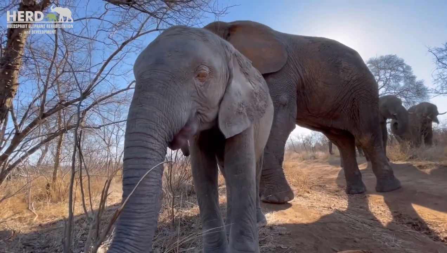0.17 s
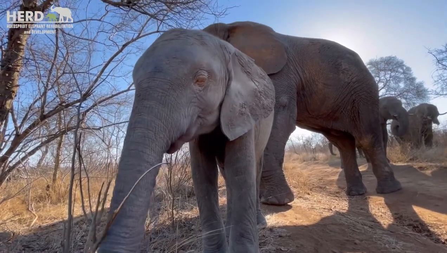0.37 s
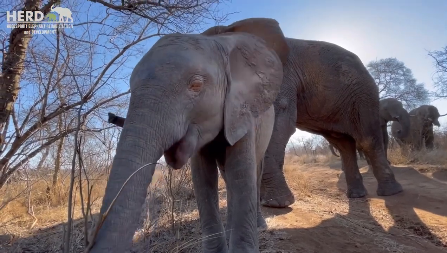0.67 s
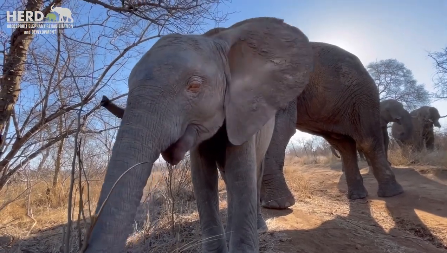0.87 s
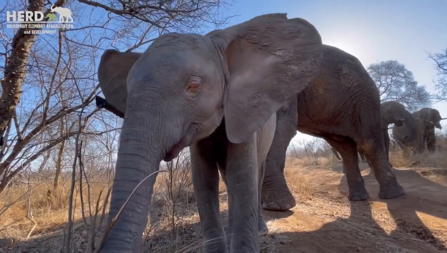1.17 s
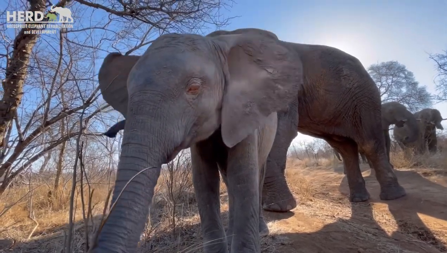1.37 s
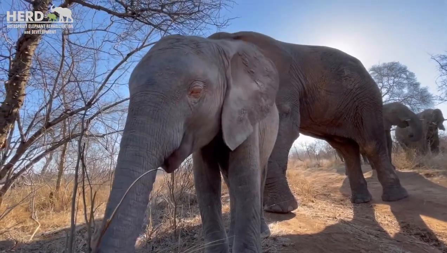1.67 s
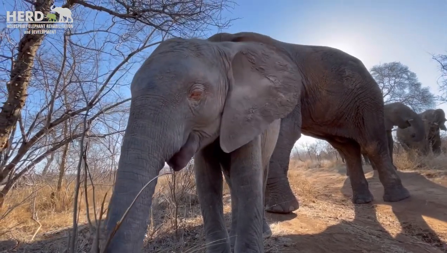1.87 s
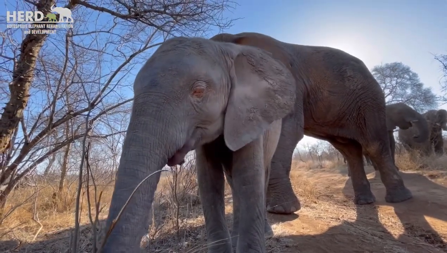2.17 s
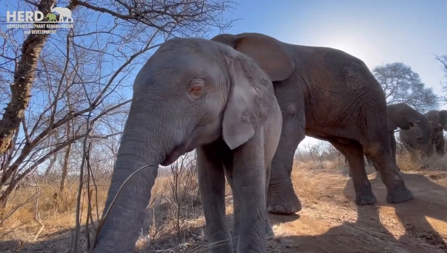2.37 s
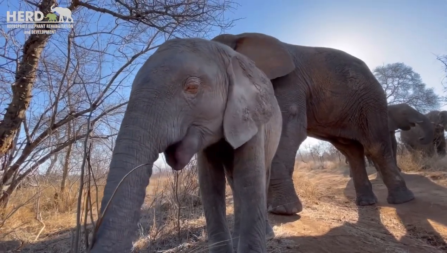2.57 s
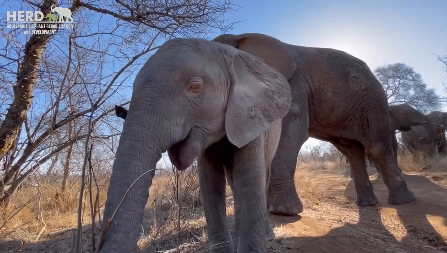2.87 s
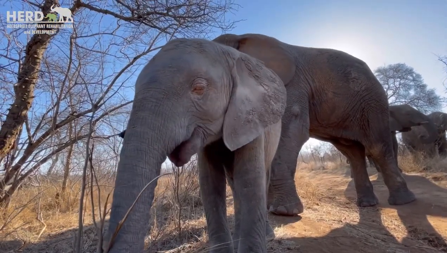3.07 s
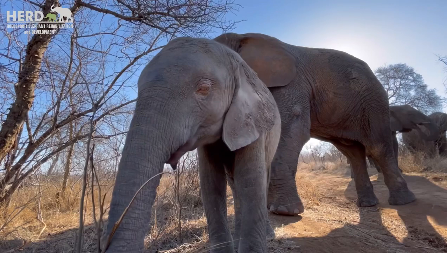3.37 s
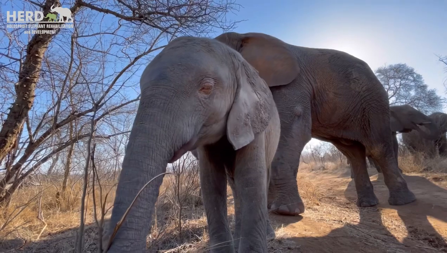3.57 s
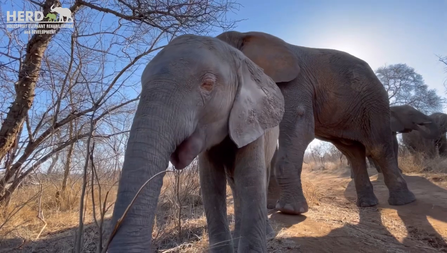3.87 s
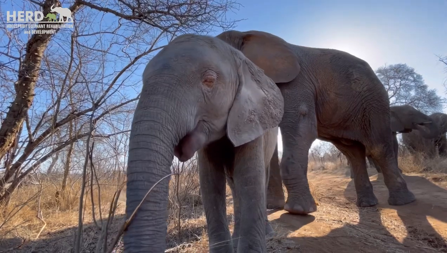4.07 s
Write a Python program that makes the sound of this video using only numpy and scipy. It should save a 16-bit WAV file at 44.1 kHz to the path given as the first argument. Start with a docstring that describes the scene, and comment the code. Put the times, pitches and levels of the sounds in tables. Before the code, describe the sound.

Light brushing of stalks and soft low thumps come first, with a low elephant rumble of about a second. After a short pause of rustling, a strong snap cracks close by. A wet smack releases a louder, coarse, fluttering growl, brighter and faster than the rumble. Then dry grass scrapes and crackles again, very near the microphone, in open air with almost no echo.

```python
"""A young elephant gives a low rumble, then smacks its mouth open for a louder, rattling call in dry bushland.
Flapping vocal folds sound as harmonics of the chest; their closures and breath ring the mouth resonances.
The trunk drags through dry grass and twigs close to a two-port microphone: coloured, crackling noise with
short snaps. Dull decaying thumps, narrow-band murmurs, a faint fuzzy whistle and a low noisy wash of air
and herd lie underneath."""
import sys
import numpy as np
from scipy import signal
from scipy.fft import rfft, irfft
from scipy.io import wavfile
from scipy.ndimage import uniform_filter1d, map_coordinates

SR = 44100
rng = np.random.default_rng(int(sys.argv[2]) if len(sys.argv) > 2 else 0)


def unload_audio(sound):
    """Save the sound as a 16-bit wav file, at the path given as the first command line argument."""
    columns = np.transpose(np.atleast_2d(sound))
    # keep every value between -1 and 1, then stretch to whole-number steps
    steps = np.round(np.clip(columns, -1, 1) * 32767)
    wavfile.write(sys.argv[1], SR, steps.astype(np.int16))


N = 185264  # samples


def rumble_voice():
    """The low rumble: slow folds that start loose and settle, heard through chest and mouth."""
    # vocal folds: (time [s], flap rate [1/s])
    rate = [(.3, 20.1), (.55, 20.0), (.72, 19.97), (.87, 19.8), (1.02, 19.73), (1.17, 19.42), (1.32, 19.3),
            (1.6, 18.9)]
    # effort: (time [s], chest [dB], mouth [dB], lingering of the main mouth ring [dB], upper harmonics [dB])
    effort = [(.34, -57, -57.5, -15.5, 7), (.4, -45.5, -56, -20.5, 7.5), (.5, -46, -53.5, -14, -7),
              (.58, -40.5, -54, -11.5, 3.5), (.67, -38, -54, -12.5, -1), (.72, -38.5, -68.5, -14, 1),
              (.97, -39, -70.5, -10, -0.5), (1.15, -38, -59, 0.5, 0), (1.3, -39.5, -57.5, 0, -2),
              (1.48, -38, -55, -0.5, -2.5), (1.5, -41, -70, -8, -4.5), (1.57, -50.5, -85, -13.5, -8.5)]
    # chest harmonics: (multiple of the flap rate, level [dB])
    harmonics = [(1, -42), (2, 0.41), (3, -2), (4, -2.5), (5, -9.5), (6, -8), (7, -27), (8, -5.5), (9, -27),
                 (10, -10), (11, -26.5), (12, -12.5), (13, -20.5), (14, -29.5), (15, -38.5), (16, -50),
                 (17, -30.5), (18, -23.5), (19, -28), (20, -25), (21, -27), (22, -23.5), (23, -25.5),
                 (24, -33.5)]
    # mouth resonances before opening and damping: (frequency [Hz], width [Hz], level [dB])
    modes = [(400, 266, -18), (683, 204, -8), (984, 86, 7.5), (1230, 86.7, -9.5), (1460, 170.3, -26)]
    # time to settle [s], then (loose, settled) pairs: odd harmonics [dB], upper harmonics [dB],
    # breath over the mouth pulses [dB], mouth opening [factor on its resonances]
    settling = (0.285, (10, -0.52), (-5.5, 1.26), (-19, -6.5), (1.011, 0.9373))
    # slow change of the mouth: (time [s], added to the opening factor)
    widening = [(.34, -0.0081), (.7, 0.031), (1.0, -0.02), (1.15, .055), (1.3, .1), (1.57, .115)]
    return voice(effort, (*settling, widening), rate, .801, harmonics, modes, main=2,
                 peak=.15, skew=.24, after=.55, after_db=-11, uneven_db=1.2)


def call_voice():
    """The louder, rattling call: faster folds behind an open mouth."""
    # vocal folds: (time [s], flap rate [1/s])
    rate = [(2.15, 33.0), (2.35, 30.81), (2.5, 30.03), (2.65, 28.79), (2.8, 28.41), (2.95, 28.18),
            (3.08, 26.71), (3.2, 23.1), (3.36, 25.0)]
    # effort: (time [s], chest [dB], mouth [dB], lingering of the main mouth ring [dB], upper harmonics [dB])
    effort = [(2.15, -69.5, -37.5, -13.5, 0), (2.22, -57.5, -42, -19, 0), (2.3, -52, -40.5, -28, 0),
              (2.38, -48, -34.5, -17.5, 0), (2.6, -49, -34, -12.5, 0), (2.84, -49.5, -37, -13.5, 0),
              (2.94, -47.5, -34, -1.5, 0), (3.04, -48, -37, -7.5, 0), (3.155, -49.5, -36.5, -12.5, 0.01),
              (3.19, -53, -60, -3.5, 0), (3.34, -61, -85.5, -3.5, 0)]
    # chest harmonics: (multiple of the flap rate, level [dB])
    harmonics = [(1, -15.5), (2, 2), (3, -5), (4, 0.5), (5, -7.5), (6, -9.5)]
    # mouth resonances before opening and damping: (frequency [Hz], width [Hz], level [dB])
    modes = [(246.4, 190, -20.5), (400.8, 99.5, -5), (636.6, 187, -11), (913.6, 101.1, 0), (1080, 139, -8),
             (1368, 198, -10), (1719, 167, -18.5), (2130, 321, -20)]
    # time to settle [s], then (loose, settled) pairs: odd harmonics [dB], upper harmonics [dB],
    # breath over the mouth pulses [dB], mouth opening [factor on its resonances]
    settling = (0.1723, (-1, 0.5), (0, 0.10056), (9.4, -7.5), (1.169, 0.9313))
    # slow widening of the mouth: (time [s], added to the opening factor)
    widening = [(2.151, 0.00117), (2.6, 0.0305), (2.8, 0.0337), (2.95, 0.088), (3.34, 0.099)]
    return voice(effort, (*settling, widening), rate, 2.6088, harmonics, modes, main=3,
                 peak=.075, skew=.65, after=.34, after_db=-14.5, uneven_db=1.4)


def voice(effort, settling, rate, closure_s, harmonics, modes, main, peak, skew, after, after_db, uneven_db):
    """Slow flaps sound through chest and trunk; each sharp closure and its breath ring the mouth."""
    chest_db, mouth_db, linger_db, top_db = curves(effort)
    gate = gate_of(effort[0][0], effort[-1][0])
    on = gate > 0
    odd_db, upper_db, breath_db, opening, loose = settle(effort[0][0], *settling)
    turns = np.cumsum(curves(rate)[0]) / SR  # flaps counted in cycles
    turns = turns - turns[round(closure_s * SR)]  # a closure falls on each whole number
    low = chest_tone(turns, harmonics, peak, skew, odd_db, upper_db + top_db)
    low = low / low[on].std() + chest_knocks(turns, loose, on)
    closures = mouth_closures(turns, modes, main, opening, linger_db, uneven_db)
    pulses = closures + gain_of(after_db) * mouth_slaps(turns - after, modes, opening)
    puffs = breath(turns - after, modes, opening)
    high = pulses / pulses[on].std() + gain_of(breath_db) * puffs / puffs[on].std()
    high /= np.sqrt(1 + gain_of(2 * breath_db))
    return gate * gain_of(chest_db) * low, gate * gain_of(mouth_db) * high


def settle(start, seconds, odd_db, upper_db, breath_db, opening, widening):
    """Slides four controls of a voice from loose to settled and adds the slow change of the mouth."""
    t = np.maximum(np.arange(N) / SR - start, 0)
    loose = 1 / (1 + (t / seconds) ** 4)
    pairs = (odd_db, upper_db, breath_db, opening)
    odd, upper, breath_level, mouth = (settled + (free - settled) * loose for free, settled in pairs)
    return odd, upper, breath_level, mouth + curves(widening)[0], loose


def chest_tone(turns, harmonics, peak, skew, odd_db, upper_db):
    """Harmonics of the flap rate; the folds part twice a cycle, so even harmonics lead."""
    k, db = np.transpose(harmonics)[:, :, None]
    scatter = rng.random(k.shape) * (k > 13.5)  # the faint upper harmonics lose step
    swing = np.sign(k - 3.5)  # the slow swing below the fourth moves against the quick flaps
    waver_turns = rng.uniform(1, 4, k.shape) * np.arange(N) / SR + rng.random(k.shape)
    waver_db = 1.1 * np.sin(2 * np.pi * waver_turns)
    level = gain_of(db + waver_db + k % 2 * odd_db + (swing > 0) * upper_db)
    return (swing * level * np.cos(2 * np.pi * (k * (turns - peak) + skew + scatter))).sum(0)


def chest_knocks(turns, loose, on):
    """While the folds are loose, each closure knocks in the chest a little late."""
    knocks = resonate(clicks(turns - .06, 1.5), hz=122.4, width=166.5, count=2)
    return gain_of(-4) * loose * knocks / knocks[on].std()


def mouth_closures(turns, modes, main, opening, linger_db, uneven_db):
    """Dull closures excite the mouth; its main ring lingers and is struck again about a third of a cycle later."""
    restrike, restrike_after = 0.61, .34  # share; delay [cycles]
    glide = 0.144  # the rings climb by this share of the opening through each flap
    shut = clicks(turns, uneven_db)
    climbing = opening * (1 + .014 * wander(.02) + glide * (turns % 1 - .15))
    closures = tract(shut, modes, climbing, damping=1.266)
    strikes = shut + restrike * clicks(turns - restrike_after + .03 * wander(0.023), 5.55)
    sign = (-1) ** main
    lingering = sign * resonate(strikes, modes[main][0] * climbing, width=28.7)
    closures = closures + gain_of(linger_db) * lingering * closures.std() / lingering.std()
    return signal.sosfilt(signal.butter(N=6, Wn=1330, fs=SR, output="sos"), sign * closures)


def mouth_slaps(turns, modes, opening):
    """A weaker, brighter and less regular slap follows each closure."""
    strikes = clicks(turns + .04 * wander(.02), 3.5)
    slaps = tract(strikes, modes[2:], (1.2 + .07 * wander(.02)) * opening, damping=1.7)
    return signal.sosfilt(signal.butter(N=4, Wn=1900, fs=SR, output="sos"), slaps)


def breath(turns, modes, opening):
    """Air noise that puffs once per flap through the mouth resonances."""
    swelling = 1.2 + np.exp(-((turns + .1) % 1) / 0.246)
    puffs = swelling * gain_of(1.7 * wander(0.0057)) * rng.standard_normal(N)
    return tract(puffs, modes[1:], (1.0385 + 0.0576 * wander(0.0085)) * opening, damping=2.55)


def smacks():
    """Wet smacks of the mouth: short decaying rings, each with a noisy wobble."""
    # (start [s], level [dB], frequency [Hz], time to fall 60 dB [s])
    rings = [(.634, -46.5, 1034, 0.041), (.677, -42, 998, 0.0243), (.678, -43, 447, 0.041),
             (2.153, -18.5, 927, 0.058), (2.165, -21.5, 1056, 0.061), (2.168, -33, 344.6, 0.031),
             (2.18, -26.5, 1121, 0.0522), (2.184, -38.5, 2210, 0.014), (2.21, -30, 2320, 0.0123),
             (2.184, -35, 426, 0.026), (2.186, -25, 648, 0.0123), (2.192, -24, 1155, 0.0285),
             (2.206, -30, 1412, 0.022), (2.214, -19.5, 1115, 0.0099), (2.221, -28, 1540, 0.0132),
             (2.246, -21.5, 1120, 0.0091), (2.251, -23.5, 1116, 0.0122), (2.261, -25.5, 1310, 0.0119),
             (2.275, -26.5, 970, 0.0127), (2.291, -17.5, 1110, 0.0176), (2.313, -36, 1066, 0.0176),
             (2.322, -16.5, 1408, 0.0106), (2.354, -29, 900, 0.0123), (2.364, -36.5, 910, 0.009),
             (2.386, -29, 1353, 0.02), (3.163, -30.5, 1082, 0.059)]
    out, t = np.zeros(N), np.arange(4000) / SR
    for s, db, hz, t60 in rings:
        wobble = 1 + 0.21 * evened(uniform_filter1d(rng.standard_normal(4000), 60))
        envelope = gain_of(db - 60 * t / t60) * (1 - np.exp(-t / 0.000436))
        add(out, s, envelope * wobble * np.sin(2 * np.pi * hz * t))
    return out


def hiss():
    """Air through a narrow, wet gap: band noise with a sudden start and a fine grain."""
    start, end = 2.152, 3.18  # s
    puff_db, puff_fall, leak_db, leak_fall = -41, 120, -54, 7  # levels in dB, falls in dB/s
    t = np.maximum(np.arange(N) / SR - start, 0)
    level = gain_of(puff_db - puff_fall * t) + gain_of(leak_db - leak_fall * t)
    air = resonate(rng.standard_normal(N), hz=8430, width=1010, count=2)
    grain = evened(gain_of(3.45 * wander(0.0017)) * air)
    return (t > 0) * gate_of(0, end) * level * grain


def grass():
    """Rubbed stalks: noise in three colours, rough with tiny crackles and snaps; two unrelated strands."""
    # body of the grass: (frequency [Hz], level [dB])
    body_colour = [(1500, -17), (2500, 0.5), (3500, -3), (4800, -2), (5650, -0.5), (6200, 2.5), (6900, 2),
                   (7500, -7.5), (8600, 2), (10000, -8.5), (12000, -14.5)]
    # bright fizz: (frequency [Hz], level [dB])
    fizz_colour = [(9000, -5.5), (11000, -3), (12800, 0.5), (14600, 7), (16500, 1)]
    # dull scrape: (frequency [Hz], level [dB])
    scrape_colour = [(150, -28.5), (300, -18), (600, -4.5), (1200, 2), (2000, -1), (3000, -16.5)]
    # rings of the stalks before the ring factor: (frequency [Hz], width [Hz], level over the grass [dB])
    stalk_rings = [(3203, 1880, -13), (6292, 864, -9)]
    rubbing, ring_factor = drags()
    crackle = gain_of(2.72 * np.minimum(rng.exponential(1, N), 3.6)) * (rng.random(N) < 420 / SR)
    rough = evened(1 + 0.604 * signal.lfilter([1], [1, -.94], crackle)) * gain_of(1.12 * wander(0.012))
    unrest = gain_of([0.6 * wander(0.0114), 3.2 * wander(0.0177), 0.87 * wander(0.0238)])
    levels = rubbing * rough * unrest + snaps()
    no_bass = signal.butter(N=3, Wn=1100, btype="high", fs=SR, output="sos")  # thin stalks carry no bass
    strands = []
    for noise in rng.standard_normal((2, 3, N)):
        colours = (body_colour, fizz_colour, scrape_colour)
        plain, fizz, scrape = (colour(n, points) for n, points in zip(noise, colours))
        # both stalk rings resonate from the same plain body and are added to it
        body = plain + sum(gain_of(ring_db) * evened(resonate(plain, hz * ring_factor, width, count=2))
                           for hz, width, ring_db in stalk_rings)
        parts = zip(levels, (body, fizz, scrape))
        body, fizz, scrape = (level * patches(part, depth_db=2.8) for level, part in parts)
        strands.append(signal.sosfilt(no_bass, body + fizz) + scrape)
    return strands


def drags():
    """Drags of the trunk swell and sink; their ring factors are averaged, weighted by the power of each drag."""
    # (peak [s], level [dB], time to rise 20 dB [s], time to fall 20 dB [s],
    # fizz over the body [dB], scrape over the body [dB], stalk ring factor); signs of the times are ignored
    strokes = [(0, -52.5, -1.77, 0.5, -21, -8, 0.9), (.27, -52.5, 0.13, 2, -9.5, -13, 0.952),
               (.42, -49.5, 1.08, 0.26, -18.5, -27.5, 1.058), (.59, -61.5, 0.08, -0.66, -4.5, -8.5, 1.17),
               (.71, -52, 0.37, 0.22, -13.5, -9, 0.977), (.745, -60, -1.2, 0.03, 7.5, -20, 1.02),
               (.93, -57.5, 11.4, 0.39, -4, -12.5, 1.455), (1.469, -49, 0.3036, 0.3841, -8.5, -14.5, 0.973),
               (1.64, -63, -2.5, -1.23, 0.5, -8.5, 0.96), (1.73, -57.5, 0.72, 1.7, -10, -4.5, 0.717),
               (1.922, -35.5, 0.0991, 0.07, -5.5, -14.5, 1.508),
               (2.001, -37.5, 0.27, 0.0437, -16.5, -11, 1.5), (2.3, -47.5, 0.4, 1, -21.5, -17.5, 1.023),
               (2.42, -42.5, 0.92, -0.2839, -14, -26, 0.978), (3.231, -49, 0.1, 0.25, -20.5, -3.5, 1.143),
               (3.309, -50, 0.3449, -0.35, -14, -16, 1.015), (3.479, -52, 0.2, 0.2, -20, -9, 0.94),
               (3.529, -45.5, -0.55, -0.36, -18, -13, 0.95), (3.589, -40.5, 0.22, 0.28, -10.5, -13, 1.014),
               (3.745, -37.5, 0.14, 0.33, -5.5, -8, 1.085), (3.945, -45.5, 0.67, 0.17, -8.5, -27, 0.99)]
    # steady stir of the grass: (body [dB], fizz [dB], scrape [dB])
    stir_db = (-70, -74, -68)
    swells = np.array([swell(*row[:4]) ** 2 for row in strokes])
    fizz_db, scrape_db, ring = np.transpose(strokes)[4:]
    power = gain_of(2 * np.array([0 * ring, fizz_db, scrape_db])) @ swells
    return np.sqrt(power + gain_of(stir_db)[:, None] ** 2), ring @ swells / swells.sum(0)


def snaps():
    """Stalks and twigs that snap: brief bursts of level for body, bright and dull noise."""
    # (start [s], level [dB], bright part over it [dB], decay constant of the body [ms])
    breaks = [(0.107, -41.5, 4, 2.9), (0.131, -44, -27.5, 3.4), (.224, -45, -22, 2.56),
              (0.255, -27.5, -24.5, 2.84), (0.268, -41, -16.5, 2.5), (.31, -48, 10.5, 4.6),
              (0.396, -33.5, -16.5, 5.6), (0.482, -38, 10.5, 3.77), (0.584, -33.5, 6.5, 3.3),
              (0.6034, -34, -1, 2.85), (0.7021, -38, -20, 2.4), (0.731, -46.5, 1.5, 2.6),
              (0.744, -46, 18.5, 2.4), (0.969, -55, 11.5, 3), (1.218, -52, 15.5, 3.2),
              (1.277, -50.5, 3, 3.6), (1.322, -41.5, 1.5, 3.5), (1.363, -39.5, -19, 2.86),
              (1.388, -40, 7.5, 3.433), (1.424, -33.5, -3, 3.2), (1.462, -35.5, 7, 8.2),
              (1.472, -30.5, 8.5, 2.3), (1.816, -50.5, -9, 1.7), (1.8456, -32, -13, 3.1),
              (1.8632, -41, -6, 5.9), (1.881, -35, -3.5, 5.6), (1.887, -32, 1.5, 4.5),
              (1.894, -40, -12, 3.1), (1.901, -40, 2.5, 2.5), (1.9135, -28.5, -6.5, 2.7),
              (1.917, -12.5, -19, 1.71), (1.931, -26.5, -13, 4.487), (1.94, -29, -17.5, 5),
              (1.975, -31.5, -12, 2.3), (1.9918, -20.5, -7.5, 3.37), (1.995, -20.5, -7, 3.58),
              (2.008, -33, -11, 2.9), (2.0354, -42.5, -12.5, 3.6), (2.056, -41, -6.5, 3),
              (2.1092, -35, -4.5, 3), (2.866, -45, -15, 4.8), (2.908, -45.5, 10.5, 6.2),
              (2.939, -33.5, 0, 4.4), (2.98, -36, -0.5, 4.2), (3.47, -41, -26, 4.4),
              (3.52, -28.5, -17, 6.8), (3.5346, -32, 12.5, 2.16), (3.56, -48, -6, 3.2),
              (3.574, -32.5, 9, 3.53), (3.5973, -22.5, -3.5, 1.63), (3.625, -20, -3, 3.38),
              (3.714, -36.5, -9, 3), (3.736, -34.5, -15, 3.1), (3.748, -28.5, -9.5, 3.4),
              (3.762, -34.5, -6.5, 2.3), (3.806, -33.5, -2, 3), (3.8389, -24.5, 12, 2.37),
              (3.8544, -35, 6, 2.64), (3.926, -41.5, -2.5, 2.16), (3.942, -36, -15.5, 3.5),
              (4.078, -57, 1, 1.4)]
    dull_db, shares = -26, (1, 0.37, 0.9)  # dull part over a snap; share of the decay for each part
    t = np.arange(1500) / SR
    rise, bursts = 1 - np.exp(-t / .00025), np.zeros((3, N))
    for s, db, bright_db, decay_ms in breaks:
        for burst, part_db, share in zip(bursts, (0, bright_db, dull_db), shares):
            fall = np.exp(-1000 * t / abs(share * decay_ms))
            add(burst, s, gain_of(db + part_db - 4.5) * rise * fall)
    return bursts


def patches(x, depth_db):
    """Random patches of time and frequency stand out or sink."""
    z = signal.stft(x, nperseg=256)[2]
    field = uniform_filter1d(rng.standard_normal(z.shape), size=4, axis=0)
    field = evened(uniform_filter1d(field, size=12, axis=1))
    return evened(signal.istft(z * gain_of(depth_db * field), nperseg=256)[1][:N])


def thumps():
    """A soft low push that rings briefly, with a short rattle just ahead."""
    # (time [s], level [dB], frequency [Hz], relative level of the rattle [dB])
    blows = [(.006, -37.5, 137.5, -17), (0.079, -26, 126.7, -14.5), (.1, -30, 134.7, -21.5),
             (.124, -36.5, 128.6, -28), (0.251, -40.5, 215, -35.5), (.39, -42, 104, -38),
             (1.41, -30.5, 176, -37.5), (1.544, -33, 164.9, -28), (1.677, -40.5, 121.3, -24.5),
             (1.722, -36, 109.4, -30.5), (1.753, -28.5, 112.5, -33), (1.829, -45.5, 129.5, -30),
             (3.198, -33.5, 121.2, -21.5), (3.82, -40.5, 145.8, -22.5), (3.835, -37.5, 56.7, -32.5),
             (3.882, -38, 130.7, -22.5), (3.91, -35, 127.2, -33)]
    # what rattles, before the tract factors: (frequency [Hz], width [Hz], level [dB])
    rattle_modes = [(463, 574, -5), (901, 100, -0.5), (1238, 274, -2), (1885, 134, 7), (2352, 219, 5)]
    out, t = np.zeros(N), np.arange(9000) / SR
    ring = gain_of(-60 * t / 0.0964) * (1 - np.exp(-t / 0.008)) * 1.3
    shaking = gain_of(-20 * (t / .028) ** 4) + .1 * gain_of(-60 * t / .3)
    for s, db, hz, rattle_db in blows:
        rattle = tract(rng.standard_normal(9000) * shaking, rattle_modes, 0.994, damping=1.44)
        add(out, s - .005, gain_of(db) * ring * np.sin(2 * np.pi * hz * t))
        add(out, max(s - .012, 0), gain_of(db + rattle_db + 18.5) * rattle)
    return out


def drone():
    """Low murmurs: noise in narrow bands that swells and sinks."""
    # (peak [s], level [dB], time to rise 20 dB [s], time to fall 20 dB [s], frequency [Hz], width [Hz]);
    # signs of the times are ignored
    murmurs = [(.03, -59.5, -2, -0.04, 525, 150), (.02, -62.5, 4, 0.18, 827, 202),
               (.11, -55, 0.26, 0.05, 505, 121.4), (1.661, -53, 0.05, 0.01, 637.5, 129.9),
               (1.69, -61.5, 0.76, 1, 895.6, 130), (1.79, -65.5, 0.24, -1.63, 621.4, 99.6),
               (3.9, -54, 0.15, 0.58, 54.7, 35)]
    return sum(swell(*row) * evened(resonate(rng.standard_normal(N), hz, width, count=2))
               for *row, hz, width in murmurs)


def whistle():
    """A slightly fuzzy tone: noise through a very narrow resonance."""
    tone = evened(resonate(rng.standard_normal(N), hz=1140, width=13.15, count=2))
    return gate_of(.86, 1.1) * gain_of(-65.5) * tone


def wash():
    """The low restless wash of air and herd: lumpy low noise."""
    # (time [s], level [dB])
    level_curve = [(0, -50.5), (.15, -56.5), (.4, -49.5), (.75, -56.5), (1.25, -52), (1.7, -51.5),
                   (2.05, -57.5), (2.4, -51), (2.9, -59), (3.2, -54), (3.45, -58.5), (3.75, -47.5),
                   (4.0, -51.5), (4.2, -55.5)]
    # (frequency [Hz], relative level [dB])
    spectrum = [(15, -5.5), (25, -53.5), (49, -1), (86, -2.5), (125, 0.5), (172, -5), (281, -12),
                (367, -14), (600, -19), (780, -24), (1320, -120)]
    db = curves(level_curve)[0]
    return gain_of(db + 2.0 * wander(0.011233)) * colour(rng.standard_normal(N), spectrum)


def bush(x):
    """A short scatter of echoes from ground, trunks and bodies, other ones in each port."""
    t = np.arange(5000) / SR
    sparse = rng.standard_normal((2, 5000)) * (rng.random((2, 5000)) < .05)
    taps = sparse * gain_of(-60 * t / 0.0356) * (t > .004)
    return signal.fftconvolve(x[None], taps / np.linalg.norm(taps, axis=1, keepdims=True), axes=1)[:, :N]


def ports(a, b):
    """Left hears strand a early; right hears it late, blended with strand b."""
    # likeness of the two ports: (frequency [Hz], share [0-1])
    likeness = [(50, .45), (110, .65), (300, .78), (1000, .88), (2500, .8), (5000, 0.79), (9000, .82),
                (11800, 0.6), (12400, .91)]
    # balance: (frequency [Hz], left over right [dB])
    balance = [(300, 0.63), (800, 6), (1400, 1), (2400, -1.0), (4400, 3.11), (8100, -0.2), (15000, -0.7)]
    lead_s, lead_from_hz, shared_hz = .0003, 1300, 12200  # no lead above shared_hz
    lead_waver_s = .000022  # the stalks rub in ever other places, so the lead wavers
    hz = np.fft.rfftfreq(N, 1 / SR)
    same, tilt = np.clip(read(likeness, hz), 0, 1), gain_of(read(balance, hz) / 2)
    heard, apart = same * rfft(a) / tilt, hz < shared_hz
    delay = np.exp(-2j * np.pi * np.maximum(hz - lead_from_hz, 0) * lead_s)
    late = irfft(heard * apart * delay, N)
    moments = np.arange(N) + lead_waver_s * SR * wander(.03)
    late = map_coordinates(late, [moments], order=3, mode="nearest")
    others = np.sqrt(1 - same ** 2) * rfft(b) / tilt
    return np.array([irfft(tilt * rfft(a), N), late + irfft(heard * ~apart + others, N)])


def gain_of(db):
    """Amplitude factor of a level in dB."""
    return 10 ** (np.asarray(db) / 20)


def evened(x):
    """Scales to rms 1."""
    return x / np.sqrt(np.mean(x ** 2) + 1e-20)


def read(points, hz):
    """Reads a curve over log frequency."""
    f, value = np.transpose(points)
    return np.interp(np.log(hz + 1), np.log(f + 1), value)


def curves(rows):
    """Each column after the time, drawn as a line over every sample."""
    s, *values = np.transpose(rows)
    return [np.interp(np.arange(N) / SR, s, v) for v in values]


def gate_of(start, end):
    """A soft gate."""
    t = np.arange(N) / SR
    return np.clip(np.minimum(t - start, end - t) / 0.006045, 0, 1)


def swell(s, db, rise, fall):
    """A gain that climbs to a peak and sinks, straight in dB."""
    t = np.arange(N) / SR - s
    return gain_of(db - 20 * np.maximum(-t / abs(rise), t / abs(fall)).clip(0, 8))


def add(mix, s, sound):
    """Lays a sound into the mix at s seconds."""
    part = mix[round(s * SR):][:len(sound)]
    part += sound[:len(part)]


def colour(x, points):
    """Filters by a spectrum in dB and evens the level."""
    return evened(irfft(rfft(x) * gain_of(read(points, np.fft.rfftfreq(N, 1 / SR))), N))


def resonate(x, hz, width, count=1):
    """A resonance of gain 1: shifts the curve hz down to zero, smooths count times, and shifts back."""
    turn = np.exp(2j * np.pi * np.cumsum(hz * np.ones(len(x))) / SR)
    r = np.exp(-np.pi * abs(width) / SR)
    low = x * turn.conj()
    for _ in range(count):
        low = signal.lfilter([1 - r], [1, -r], low)
    return 2 * (turn * low).real


def tract(x, modes, opening, damping):
    """Steep resonances side by side, neighbours in opposite phase."""
    return sum((-1) ** k * gain_of(db) * resonate(x, hz * opening, damping * width, count=2)
               for k, (hz, width, db) in enumerate(modes))


def wander(seconds):
    """Slow chance with rms 1: noise averaged twice over a window."""
    size = max(round(seconds * SR), 1)
    return evened(uniform_filter1d(uniform_filter1d(rng.standard_normal(N), size), size))


def clicks(turns, uneven_db):
    """One click of uneven size each time the count passes a whole number."""
    passed = np.diff(np.floor(turns), prepend=np.floor(turns[0])) > 0
    return passed * gain_of(uneven_db * rng.standard_normal(N))


def scene():
    """Voices, close grass and background at the two ports."""
    chest, mouth = rumble_voice()
    call_chest, call_mouth = call_voice()
    low, trunk, open_mouth = chest + thumps() + drone(), mouth + whistle(), call_mouth + smacks()
    stalks, other_stalks = grass()
    near = ports(stalks + hiss() + wash(), other_stalks + hiss() + wash())
    # the rumble is slightly louder in the left port, the open mouth in the right: [[left dB], [right dB]]
    rumble = low * gain_of([[.8], [-.8]]) + trunk * gain_of([[1.8], [-1.8]])
    rumble = np.array([rumble[0], np.roll(rumble[1], round(.00024 * SR))])  # reaches the left port first
    voices = rumble + call_chest + open_mouth * gain_of([[-1.2], [1.1]])
    return voices + gain_of(-20.5) * bush(open_mouth) + gain_of(-8) * bush(trunk) + near


def record(dry):
    """The band limit: a steep low-pass."""
    low_pass = signal.firwin(401, 16050, window=("kaiser", 9), fs=SR)
    return signal.oaconvolve(dry, low_pass[None], "same")


dry = scene()
out = record(dry)
unload_audio(out)
```